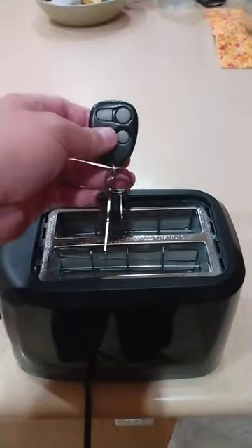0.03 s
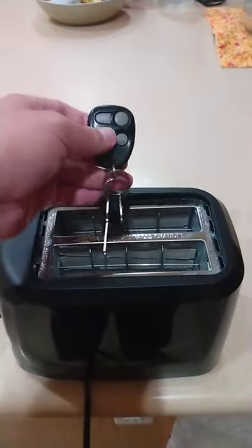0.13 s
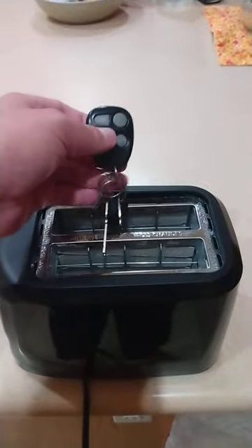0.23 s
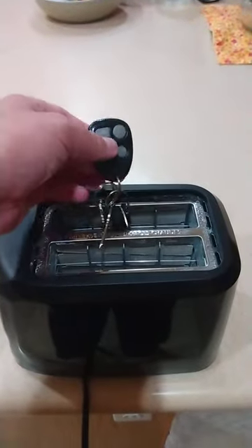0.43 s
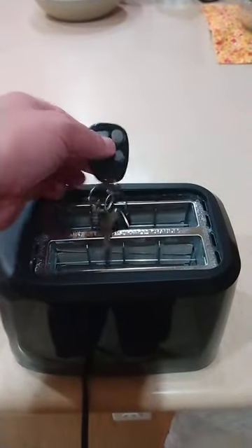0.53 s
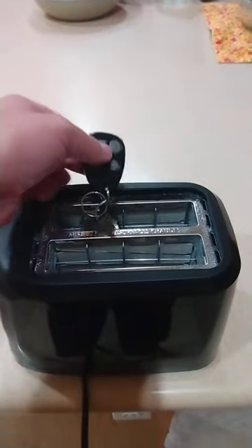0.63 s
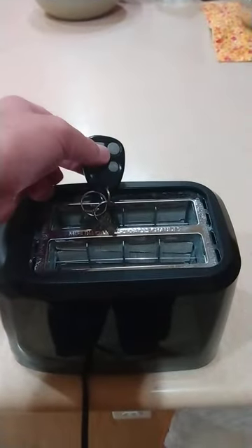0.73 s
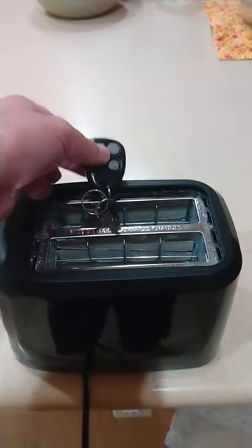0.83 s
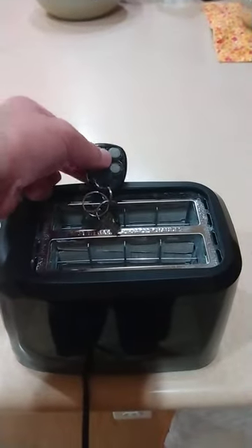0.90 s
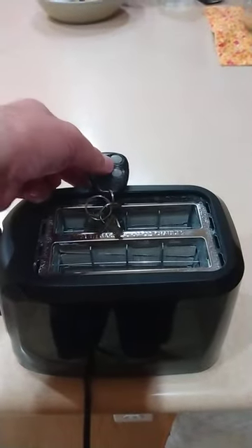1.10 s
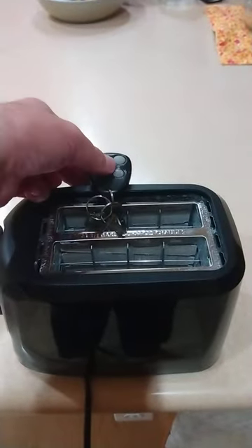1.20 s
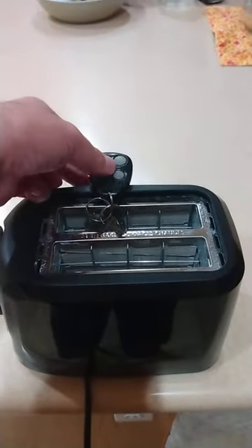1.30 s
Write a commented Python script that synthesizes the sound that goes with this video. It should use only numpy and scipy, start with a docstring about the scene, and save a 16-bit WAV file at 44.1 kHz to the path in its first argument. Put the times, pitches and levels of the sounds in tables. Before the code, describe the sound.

Metal keys clink against a toaster's steel slots, close by in a quiet kitchen. Light ticks at the start thicken into bright, uneven jingling from about 0.2 to 0.6 seconds. Around 0.7 to 0.8 seconds the bunch lands in the loudest clatter, with a light thump from the hollow casing. A few faint ticks follow until about 1.1 seconds, leaving only a soft room hush.

```python
"""Keys lowered onto a toaster.

In a quiet kitchen, keys on a fob tick against the steel slot frame and each other, then land in one
clatter that thumps the hollow casing. Each strike is a noise burst plus decaying frame and casing modes.
Counter and walls answer each tick. The hand rubs faintly on the fob over still room air."""
import sys
import numpy as np
from scipy import signal
from scipy.fft import rfft, irfft
from scipy.io import wavfile

SR = 44100
rng = np.random.default_rng(int(sys.argv[2]) if len(sys.argv) > 2 else 0)


def master(y):
    """Save y as 16-bit WAV."""
    cut = np.clip(np.atleast_2d(y).T, -1, 1)
    pcm = np.round(cut * 32767)  # scale
    wavfile.write(sys.argv[1], SR, pcm.astype(np.int16))


N = 59535

# keys on toaster: start_s, level_db, clunk_db, bright_db, frame_db, casing_db, focus_hz, sizzle_t60_s
STRIKES = [(.004, -21, -16, -6, 5, -15, 3160, 0.13), (.021, -34, -1, -1, 12, -2.5, 2980, .09),
           (0.0433, -15, -7, -6, -3, -18, 3340, 0.072), (.125, -20, 3.5, -2.5, 3, -11, 7230, 0.084),
           (0.1845, -6.5, -10.5, 4, -7.5, -3, 2120, 0.066), (.190, -9, -9.5, -9, 4, -3, 6150, 0.089),
           (0.2272, -5, 1.5, 3.5, -1, -2.5, 2680, 0.064), (0.2799, -7.5, 3, 10.5, -8, -6, 6560, 0.052),
           (.283, -1.5, -10, 2.5, -6, -7.5, 5020, 0.074), (0.303, -10.5, -6.5, 1.5, -1.5, -10, 3340, 0.043),
           (.328, -17, -9, -3, 8, -7.5, 3360, 0.083), (0.3518, -15.5, -6, 4, -1.5, -1.5, 5400, 0.12),
           (0.3676, -2, -3, 1.5, -0.5, -11, 2660, 0.13), (.382, -4.5, -11.5, -3, 1.5, -18, 2170, .06),
           (.3865, -11, -4, 1.5, -1, -4, 5400, .07), (.392, -6, -4.5, -1.5, -9, -18, 5470, 0.061),
           (.412, -13.5, 8, -14, -4.5, 12.5, 2184, 0.073), (.433, -9, 11, -2, -2.5, 5, 1240, 0.06),
           (0.4379, -12.5, 8.5, 0, -5.5, -1, 1240, 0.075), (0.4554, -15, -10, 5.5, -6, -0.5, 7240, 0.042),
           (.4625, -1.5, -25.5, -2.5, -5.5, -6, 2184, 0.035), (.4645, 2.5, 2.5, -10, -19.5, -7, 2915, 0.05),
           (.486, -15.5, 6.5, -2.5, -19.5, -7, 1240, .05), (0.5477, -8.5, 1, -4.5, -17, 2.5, 2960, 0.1),
           (.576, -15.5, 2, 1.5, -4, -9, 2140, .05), (.621, -20, -10, -1.5, 1, 4, 6230, 0.11),
           (0.6627, -10.5, 6.5, 6, -4.5, 6, 5500, .07), (.677, -8.5, 1.5, -3.5, -5.5, -3.5, 2915, 0.053),
           (.698, -9, 2.5, -2.5, -6, 8, 3000, .08), (0.7117, -0.5, 6.5, 1.5, -1, -3.5, 1397, 0.097),
           (.714, -11, 6.5, -7, -9, -14, 1390, 0.1), (.717, 7.5, -2, 1.5, -6, -4.5, 7200, 0.046),
           (0.7211, 5.5, -1, -2.5, -10, -5.5, 2710, 0.077), (.727, 3, 5, -11.5, -5, -9, 2210, 0.12),
           (0.739, -1.5, 7, 5.5, -11, -16, 1390, .07), (.748, -3.5, -5.5, -0.5, -21, 11.5, 2362, 0.11),
           (.756, -0.5, 4.5, -0.5, -19, 9, 4005, 0.084), (.765, -9, 10.5, -21.5, -7.5, 4, 1875, 0.099),
           (.776, -5.5, 6, -2.5, -24, 1.5, 7360, .06), (.787, -10.5, -3, -18, -15, 5, 2184, 0.083),
           (.822, -16.5, -7, -8, -14.5, 4, 2184, 0.13), (.893, -24, 0, -1.5, -2, 3, 3000, 0.093),
           (.971, -30.5, 2, -5, 0, -3, 2362, 0.081), (1.12, -32, 2, -4, 0, 2, 4005, .07)]
# key on key: start_s, level_db
PINGS = [(.384, -1.5), (.435, -13.5), (.455, -2), (.5765, -5.5), (.579, -3)]
# weight of the bunch on the casing: start_s, level_db
BUMPS = [(.468, -9.5), (.727, -10), (0.7466, 1.5), (.753, -6), (.786, -9)]
# steel slot frame with keys touching: pitch_hz, level_db, t60_s
FRAME_MODES = [(1136, -10.5, .14), (1244, -9, 0.15), (1372, -4.5, .18), (1864, -5.5, 0.11), (2037, 4, 0.21),
               (2190, 1, 0.25), (2330, -6.5, 0.23), (2563, -4.5, 0.21), (2994, 4.5, 0.13),
               (2850, -12, 0.33), (3400, -2, 0.16), (4005, 3, 0.15), (5030, -4.5, 0.13), (5406, 3.5, .12),
               (6030, -6, .12), (6230, -10, 0.52), (6900, -10, 0.17), (7320, -2.5, 0.18)]
# free key: pitch_hz, level_db, t60_s
KEY_MODES = [(2070, -0.5, 0.046), (2380, -20.5, .08), (4640, -1.5, .045), (5205, 5, 0.059),
             (6506, -3, 0.049)]
# hollow casing: pitch_hz, level_db, t60_s
CASING_MODES = [(349, -7.5, 0.11), (411, -8, .16), (479.1, -0.5, 0.13), (520, -1, .13), (574, -8, 0.12)]
# toaster rocking on the counter: pitch_hz, level_db, t60_s
THUD_MODES = [(146, -5.5, .15), (176, 1.5, 0.086), (213, -4, 0.075), (411.5, -0.5, 0.21), (490, -4, 0.064),
              (638, -10, .06)]
# metal contact spectrum: freq_hz, gain_db
CONTACT_EQ = [(60, -14), (200, -16.5), (350, -10.5), (540, -7), (820, -13), (1200, -2.5), (2100, 3.5),
              (3200, 2.5), (4500, 0), (5600, 1.5), (7500, -0.5), (8500, -25)]
# reflections off counter, cupboards and wall: delay_s, level_db
ECHOES = [(.0023, -5.5), (.0052, -13), (.0071, -16.5), (.0098, -21), (.0135, -18), (0.0184, -18)]
# kitchen reverb decay: freq_hz, t60_s
ROOM_DECAY = [(150, 0.18), (500, 0.69), (2000, 0.41), (7500, 0.3)]
# hand rub envelope: time_s, level_db
RUB_ENVELOPE = [(0, -64.5), (.1, -77), (0.299, -61.5), (0.519, -68.5), (.64, -64.5), (.9, -68.5),
                (.98, -73.5), (1.039, -78.5), (1.13, -72.5), (1.18, -77), (1.24, -69), (1.35, -81)]
# hand rub spectrum: freq_hz, gain_db
RUB_EQ = [(30, -20), (70, 7), (130, -11.5), (200, -13), (480, 5), (800, -12), (1200, 7), (2500, -3),
          (4000, 2.5), (7500, -14.5)]
# room air spectrum: freq_hz, gain_db
AIR_EQ = [(20, -38.5), (40, -22.5), (65, -3.5), (100, -1.5), (170, -2.5), (300, 0), (500, -2), (620, -10.5),
          (800, -11.5), (1200, -12.5), (2400, -9.5), (4000, -18.5), (7500, -21.5), (9000, -57.5)]

FRAME_DB, KEY_DB, CASING_DB, THUD_DB = -51.5, -43, -54, -45.5
METAL_RISE_S, CASING_RISE_S = 0.00075, 0.003
TICK_S, TICK_DB, SIZZLE_DB = 0.00046, -19, -12
CLUNK_HZ, MIDDLE_HZ, BRIGHT_HZ = 1250, 2760, 5800
FOCUS_DB, FOCUS_WIDTH_OCT, FOCUS_DECAY_S = 13, 0.074, 0.022
DETUNE_RATIO = 0.006  # the touching key shifts the frame modes
MAX_T60_S = 0.15  # hand and resting keys damp every mode


def keys(low_cut_hz=140):
    """Pings, bumps and strikes of the bunch; the small body radiates no deep bass."""
    out = np.zeros(N)
    for start_s, level_db in PINGS:
        add(out, start_s, amp(KEY_DB + level_db) * ring(KEY_MODES, METAL_RISE_S))
    for start_s, level_db in BUMPS:
        add(out, start_s, amp(THUD_DB + level_db) * ring(THUD_MODES, CASING_RISE_S))
    for start_s, *settings in STRIKES:
        add(out, start_s, strike(*settings))
    return signal.sosfilt(signal.butter(2, low_cut_hz, "high", fs=SR, output="sos"), out)


def strike(level_db, clunk_db, bright_db, frame_db, casing_db, focus_hz, sizzle_t60_s):
    """Key on frame: hard tick, dense sizzle of thin steel, frame modes, casing beneath."""
    t = np.arange(SR // 2) / SR
    tick = amp(TICK_DB) * burst(t * np.exp(-t / TICK_S))
    sizzle = amp(SIZZLE_DB) * burst(amp(-60 * t / sizzle_t60_s))
    contact = equalise(chatter(tick + sizzle), CONTACT_EQ)
    frame = amp(FRAME_DB + frame_db) * ring(FRAME_MODES, METAL_RISE_S, focus_hz)
    casing = amp(CASING_DB + casing_db) * ring(CASING_MODES, CASING_RISE_S)
    metal_eq = [(CLUNK_HZ / 2, 0), (CLUNK_HZ, clunk_db), (MIDDLE_HZ, 0), (BRIGHT_HZ, bright_db)]
    return amp(level_db) * (equalise(contact + frame, metal_eq) + casing)


def chatter(contact, rate_per_s=300, decay_s=0.014, gain_db=-11.5):
    """First contact plus a few random, fading rebounds."""
    t = np.arange(SR // 20) / SR
    hits = rng.random(len(t)) < rate_per_s / SR
    rebounds = hits * rng.standard_normal(len(t)) * amp(gain_db) * np.exp(-t / decay_s)
    return contact + signal.fftconvolve(contact, rebounds)[:len(contact)]


def ring(modes, rise_s, focus_hz=None):
    """Decaying modes; those near focus_hz are favoured while the key still touches."""
    t = np.arange(SR // 2) / SR
    pitch_hz, level_db, t60_s = np.transpose(modes)[:, :, None]
    phase_cycles = rng.random(pitch_hz.shape)
    if focus_hz:
        nearness = np.exp(-(np.log2(pitch_hz / focus_hz) / FOCUS_WIDTH_OCT) ** 2)
        level_db = level_db + FOCUS_DB * nearness * np.exp(-t / FOCUS_DECAY_S)
        pitch_hz = pitch_hz * (1 + DETUNE_RATIO * rng.standard_normal(pitch_hz.shape))
    envelopes = amp(level_db - 60 * t / np.minimum(t60_s, MAX_T60_S))
    partials = envelopes * np.sin(2 * np.pi * (pitch_hz * t + phase_cycles))
    return partials.sum(0) * (1 - np.exp(-t / rise_s))


def kitchen(direct, tail_db=-13, tail_delay_s=0.0071, scatter_s=0.00035):
    """Direct sound, reflections scattered by things on the counter, short diffuse tail."""
    freq_hz, t, spectra = signal.stft(rng.standard_normal(SR), SR, nperseg=256)
    decay = amp(-60 * t / interp_log_hz(ROOM_DECAY, freq_hz)[:, None])
    tail = signal.istft(spectra * decay, SR, nperseg=256)[1]
    response = np.zeros(SR)
    response[0] = 1
    add(response, tail_delay_s, amp(tail_db) * tail / np.linalg.norm(tail))
    smear = np.exp(-np.arange(SR // 50) / SR / scatter_s)
    for delay_s, level_db in ECHOES:
        add(response, delay_s, amp(level_db) * burst(smear))
    return signal.fftconvolve(direct, response)[:N]


def hand_rub():
    """Faint friction of hand on fob."""
    time_s, level_db = np.transpose(RUB_ENVELOPE)
    return amp(np.interp(np.arange(N) / SR, time_s, level_db)) * noise(RUB_EQ)


def room_air(level_db=-68):
    """Steady hush of the still room."""
    return amp(level_db) * noise(AIR_EQ)


def burst(envelope):
    """Enveloped noise, unit energy."""
    x = envelope * rng.standard_normal(len(envelope))
    return x / np.linalg.norm(x)


def noise(eq):
    """Coloured noise, unit rms."""
    gain = amp(interp_log_hz(eq, np.fft.rfftfreq(N, 1 / SR)))
    x = irfft(rfft(rng.standard_normal(N)) * gain, N)
    return x / x.std()


def equalise(x, eq, fft_size=4096):
    """Minimum-phase filter from a (freq_hz, gain_db) curve."""
    freq_hz = abs(np.fft.fftfreq(fft_size, 1 / SR))
    log_gain = np.log(amp(interp_log_hz(eq, freq_hz)))
    spectrum = np.exp(np.conj(signal.hilbert(log_gain)))
    taps = np.fft.ifft(spectrum).real[:fft_size // 2]
    return signal.fftconvolve(x, taps)[:len(x)]


def interp_log_hz(table, freq_hz):
    """Table lookup on a log-frequency axis."""
    knots_hz, values = np.transpose(table)
    return np.interp(np.log(freq_hz + 1), np.log(knots_hz + 1), values)


def amp(db):
    """Decibels to gain."""
    return 10 ** (np.asarray(db) / 20)


def add(mix, start_s, sound):
    """Mix in a sound at start_s."""
    part = mix[max(round(start_s * SR), 0):][:len(sound)]
    part += sound[:len(part)]


def scene():
    """Keys in the kitchen over hand rub and room air; mono."""
    return (kitchen(keys()) + hand_rub() + room_air())[None]


def record(dry, cutoff_hz=8250):
    """Low-pass band limit."""
    taps = signal.firwin(161, cutoff_hz, window=("kaiser", 7), fs=SR)
    return signal.oaconvolve(dry, taps[None], "same")


dry = scene()
out = record(dry)
master(out)
```